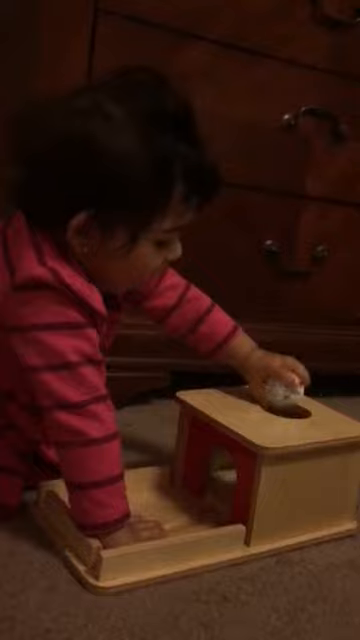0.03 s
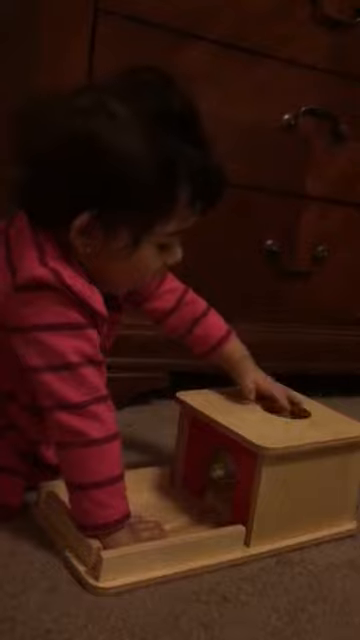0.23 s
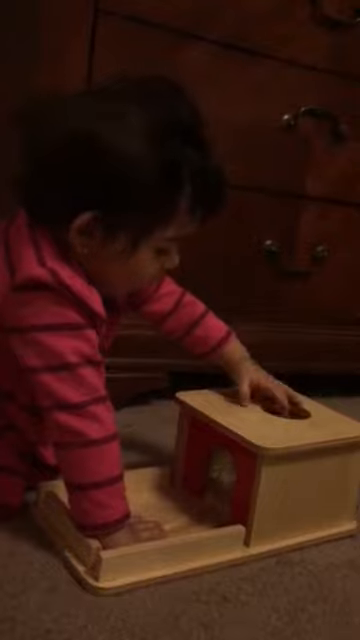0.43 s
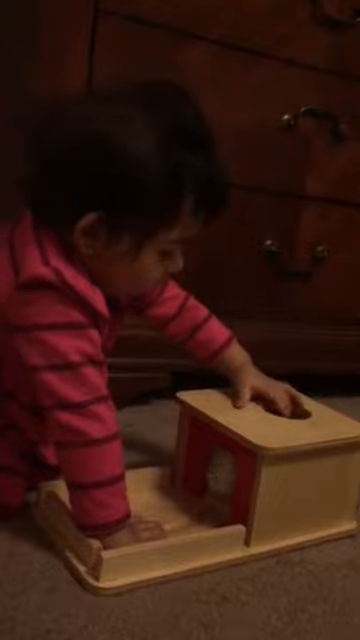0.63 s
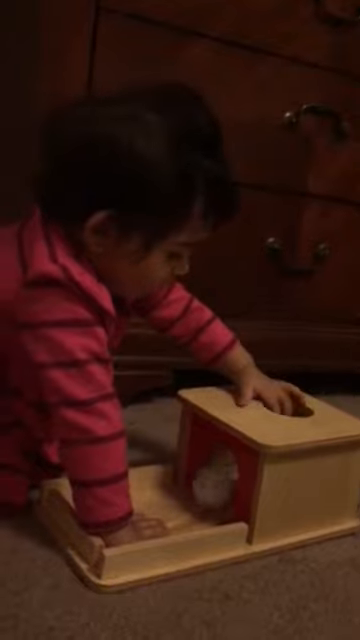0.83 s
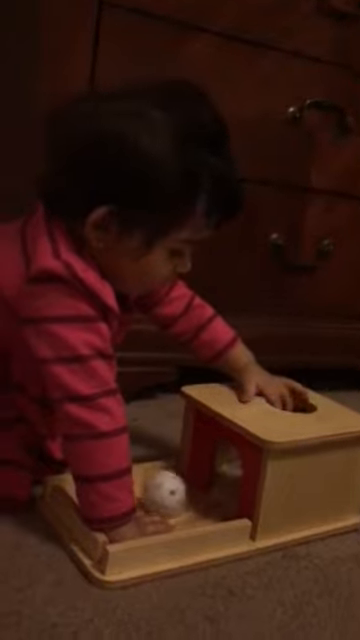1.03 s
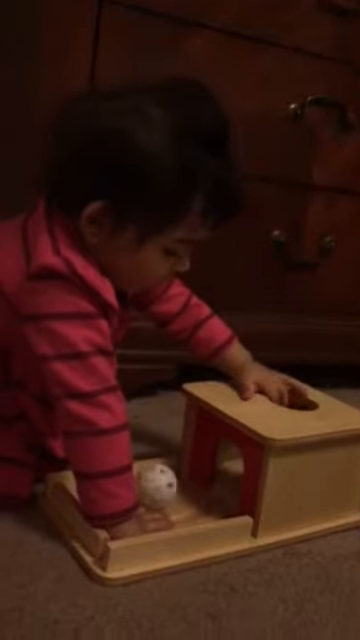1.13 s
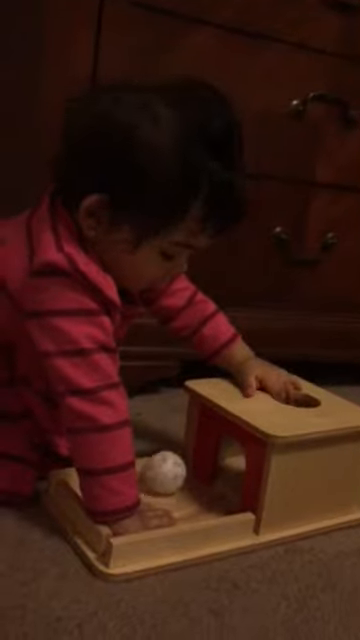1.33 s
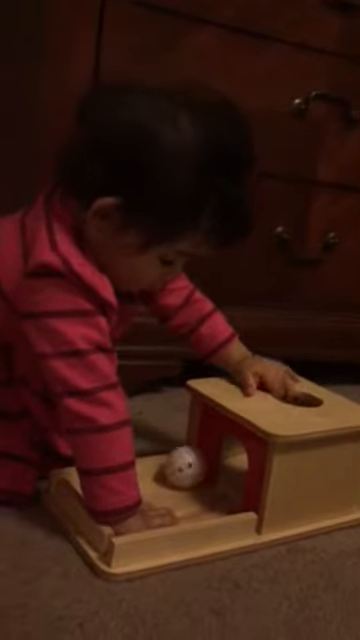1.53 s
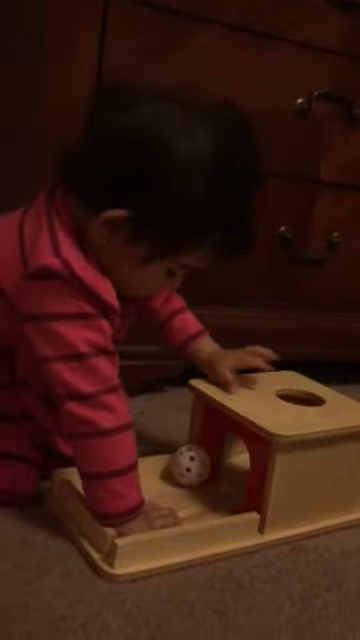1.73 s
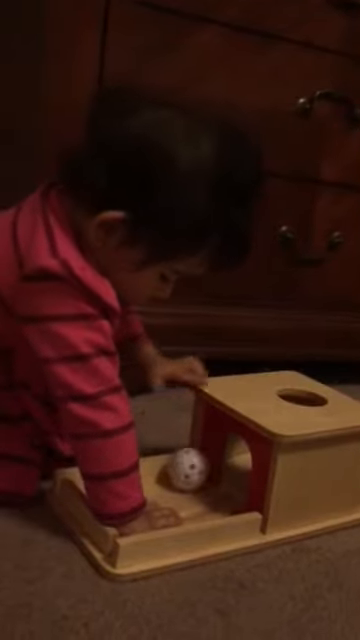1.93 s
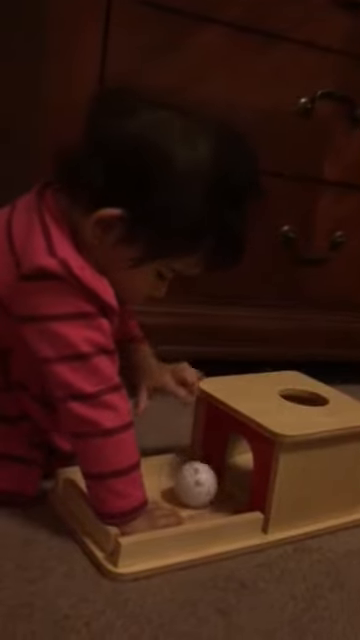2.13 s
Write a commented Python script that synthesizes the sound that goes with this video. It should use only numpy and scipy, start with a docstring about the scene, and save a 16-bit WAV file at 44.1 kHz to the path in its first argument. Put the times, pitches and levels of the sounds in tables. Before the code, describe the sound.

Close wooden clacks of a plastic ball falling into a toy box: a brief scrape, a sharp knock, faster and softer bounces, then a light rattling roll. A few faint taps follow over a low room rumble.

```python
"""In a carpeted room, a hollow plastic ball is pushed through the hole in a wooden toy box's lid.
It scrapes past the rim, lands with a knock, bounces ever faster towards the box's doorway,
then rolls out and chatters across the wooden tray. Each hit makes the wood ring and the ball click.
A few faint taps follow as the hand leaves the box. A quiet, low rumble lies underneath."""
import sys
import numpy as np
from scipy import signal
from scipy.fft import rfft, irfft
from scipy.io import wavfile
from scipy.ndimage import uniform_filter1d

SR = 44100
rng = np.random.default_rng(int(sys.argv[2]) if len(sys.argv) > 2 else 0)


def persist_wave(psi):
    """Save psi, clipped to +-1, as 16-bit WAV."""
    counts = np.round(np.clip(psi, -1, 1) * 32767).astype(np.int16)
    wavfile.write(sys.argv[1], SR, np.atleast_2d(counts).T)


N = 97020
T = np.arange(SR // 3) / SR  # time since a hit [s]
RIM, BACK, MIDDLE, FRONT, SILL, TRAY = range(6)  # places to hit; BACK to FRONT are on the box's floor

# A "colour" says how strong each pitch is in a noise. A "fade time" is how long a 60 dB drop takes.
# Steady background noise (frequency [Hz], relative level [dB])
ROOM_TONE_COLOUR = [(20, -26), (35, -19.5), (50, -5.5), (85, 0), (190, -12), (270, -16.5), (400, -21.5),
                    (700, -30), (1500, -30.5), (3600, -34), (10500, -41.5)]
# Muffled rumble (time [s], level [dB])
RUMBLE_LEVELS = [(0, -53.5), (.07, -70.5), (.12, -55.5), (.2, -60.5), (.3, -57.5), (.7, -56), (1.1, -58),
                 (1.38, -55.5), (1.54, -57.5), (1.66, -68), (1.73, -51), (1.92, -64), (1.97, -52),
                 (2.02, -59), (2.2, -54.5)]
# The rumble's colour (frequency [Hz], relative level [dB])
RUMBLE_SPECTRUM = [(30, -30.5), (55, -13), (85, 1), (130, -0.5), (200, -1.5), (270, -10), (400, -28.5),
                   (1000, -50.5)]
# How long the room echoes (frequency [Hz], fade time [s])
ECHO_FADES = [(150, 0.6), (600, 0.52), (1200, 0.16), (2600, 0.25), (6000, 0.15), (10000, 0.3)]
# How strongly it echoes (frequency [Hz], level [dB])
ECHO_LEVELS = [(150, -17.5), (600, -15.5), (820, -17), (1000, -15), (1250, -12.5), (1700, -8),
               (2700, -11.5), (4200, -11), (6000, -10.5), (10000, -18)]
# The wood's own tones (frequency [Hz], fade time [s], then for each of the six places: strength [dB])
WOOD_TONES = [ (87.1, 0.25, -37.5, -34.5, -20, -17, -17, 5),
              (205, 0.018, -37.5, -20.5, -31.5, -39, -31.5, -19),
              (366.5, 0.028, -24, -17.5, -25, -23, -23, -14.5),
              (508, 0.034, -11, -9.5, -15, -23.5, -29, -22.5),
              (626.6, 0.051, -29, -7, -15, -31, -27, -16.5),
              (726.4, .07, -16, -13.5, -8.5, -12, -26.5, -11),
              (961.4, .055, -28.5, 0.5, -4, -10.5, -14, 6.5), (1086.5, .03, -23, 2.5, 0, -5, -10, -7),
              (1205.6, 0.049, 2.5, 1.5, 3.5, 4, 2.5, -4), (1310.4, 0.099, -18.5, -4, -4, -22.5, -13, -4),
              (1415, 0.028, -19, -12, -17, -14.5, -19.5, -2.5),
              (1589.5, 0.078, -19.5, -19.5, -12, -8, -8.5, -5.5),
              (1786, 0.039, -25, -8.5, -14.5, -12, -9, -1), (2137, .03, -26, -21.5, -16.5, -12.5, -7.5, 1),
              (2418, 0.029, -25.5, -18.5, -23.5, -25, -21.5, -29),
              (2660, 0.054, -17.5, -7.5, -5.5, -8.5, -26.5, -26.5),
              (2844, 0.054, -41, -28.5, -39, -49, -37, -13),
              (3412, .02, -36.5, -24.5, -12.5, -13.5, -28, -19),
              (5535, 0.029, -53, -21.5, -38.5, -43, -44.5, -40),
              (5916, 0.025, -47, -18.5, -42, -30.5, -31, -16.5)]
# Crowded higher tones that blur into a clatter (frequency [Hz], relative level [dB])
CLATTER_COLOUR = [(60, -40), (200, -23.5), (800, -19), (1300, -12), (2000, 4.5), (3600, 0.5), (4400, -2),
                  (6000, -4.5), (7000, -12), (10500, -21)]
CLATTER_DB = [-25.5, -7, -15.5, -25.5, -17, -15]  # one for each place
# The ball's own tones (frequency [Hz], relative level [dB], fade time [s])
SHELL_TONES = [(4750, -13, 0.01), (5890, -1, 0.012), (6422, 2, 0.017), (6820, -3, 0.015),
               (7420, -2.5, 0.024), (8240, 1.5, 0.015), (9104, -1, 0.014), (10050, -7, 0.0071)]
# Its many short tones that blur into a crack (frequency [Hz], relative level [dB])
CRACK_COLOUR = [(150, -2.5), (500, -8), (1500, 4), (2400, -3), (3400, 0.5), (4500, -14), (6000, -7.5),
                (8500, -2), (10500, -7)]
# The ball scraping through the hole (time [s], level [dB])
SCRAPE_LEVELS = [(.238, -70.5), (.246, -52.5), (.265, -45.5), (.285, -42), (.298, -46.5), (.318, -52),
                 (.332, -71)]
# The scrape's hiss (frequency [Hz], relative level [dB])
SCRAPE_COLOUR = [(400, -7), (520, 4), (800, -9.5), (1200, 5.5), (1800, -4), (2650, 4.5), (3200, -6),
                 (4700, -16.5), (6200, -4.5), (8300, -5.5), (9400, 0.5), (10800, -8)]
# The ball rolling on the tray (time [s], level before filtering [dB])
ROLL_LEVELS = [(.9, -84), (.98, -64), (1.13, -43.5), (1.19, -65), (1.28, -67.5), (1.42, -64.5),
               (1.5, -62.5), (1.56, -54.5), (1.64, -101.5)]
# The ball bumping over its own holes (time [s], wood gain [dB], click gain [dB])
ROLL_BUMPS = [ (1.1685, -60.5, -60.5), (1.196, -71, -52.5), (1.2163, -68.5, -52.5), (1.237, -61, -57.5),
              (1.2899, -36.5, -41), (1.3109, -38, -47), (1.3293, -37, -42.5), (1.3462, -38.5, -43.5),
              (1.3600, -36, -62), (1.3719, -36, -47.5), (1.3828, -39.5, -46.5), (1.3920, -41, -56),
              (1.4000, -37.5, -56), (1.4070, -41, -54), (1.4151, -44.5, -57), (1.4187, -44, -75),
              (1.4260, -55.5, -72.5), (2.1070, -56.5, -82)]
# Knocks and taps (time [s], place, wood gain [dB], click gain [dB])
HITS = [ (.2384, RIM, -14.5, -47), (0.2747, RIM, -26, -61), (0.3704, RIM, -41.5, -65.5),
        (.3900, BACK, -4.5, -21), (0.3945, SILL, -27.5, -28), (.4870, BACK, -36.5, -43.5),
        (0.5347, MIDDLE, -8.5, -18), (.5920, SILL, -29, -50), (.6497, MIDDLE, -9, -20.5),
        (.7675, FRONT, -12, -19.5), (.7790, TRAY, -34, -45), (0.8597, SILL, -31, -32),
        (0.8665, SILL, -14, -19.5), (0.915, SILL, -45, -39), (0.9524, RIM, -24, -42.5),
        (.9790, SILL, -24, -28), (1.0070, TRAY, -59, -47), (1.021, TRAY, -32.5, -34),
        (1.0553, TRAY, -31.5, -35.5), (1.087, TRAY, -36, -43.5), (1.118, TRAY, -33, -33),
        (1.5048, TRAY, -32.5, -38), (1.703, RIM, -64.5, -92.5), (1.7524, RIM, -46.5, -60)]


def amp(db):
    """Turns decibels into a number to multiply by."""
    return 10 ** (np.asarray(db) / 20)


def unit(x):
    """Scales a sound to an average (rms) size of one."""
    return x / np.sqrt(np.mean(x ** 2) + 1e-20)


def read(table, hz):
    """Looks up a value by pitch, sliding smoothly between rows."""
    row_hz, value = np.transpose(table)
    return np.interp(np.log(hz + 1), np.log(row_hz + 1), value)


def level(table):
    """A volume curve from rows of (time [s], level [dB]); silent outside them."""
    return amp(np.interp(np.arange(N) / SR, *np.transpose(table), left=-140, right=-140))


def noise(colour, size):
    """Noise of the given colour."""
    gains = amp(read(colour, np.fft.rfftfreq(size, 1 / SR)))
    return unit(irfft(rfft(rng.standard_normal(size)) * gains, size))


def add(mix, start_s, sound):
    """Mixes a sound in at the given time."""
    part = mix[round(start_s * SR):][:len(sound)]
    part += sound[:len(part)]


def low_pass(x, hz):
    """Cuts away the sound above a frequency."""
    taps = signal.firwin(301, hz, window=("kaiser", 7), fs=SR)
    return signal.oaconvolve(x, taps[None], "same")


def background():
    """Quiet room noise, microphone hiss and an uneven low rumble."""
    room_tone = amp(-60.5) * noise(ROOM_TONE_COLOUR, N)
    hiss = amp(-81) * rng.standard_normal(N)
    return room_tone + hiss + level(RUMBLE_LEVELS) * noise(RUMBLE_SPECTRUM, N)


def room(x, near_db=-16, near_fade_s=.061):
    """Adds quick echoes off the tray, the child and a chest of drawers, then a short, soft tail."""
    t = np.arange(SR // 2) / SR
    near, far = rng.choice([-1., 1.], (2, len(t))) * (rng.random((2, len(t))) < .12)  # scattered echoes
    near = near * amp(-60 * t / near_fade_s) * (t > .003)
    hz, when, bands = signal.stft(far * np.clip(t / .014, 0, 1) ** 2, SR, nperseg=256)
    fade_s = read(ECHO_FADES, hz)[:, None]
    bands *= amp(read(ECHO_LEVELS, hz)[:, None] - 60 * when / fade_s)
    bands *= np.sqrt(2 * np.log(1000) / (fade_s * SR * np.mean(far ** 2)))  # long fades add no energy
    tail = signal.istft(bands, SR, nperseg=256)[1][:len(t)]
    return x + signal.fftconvolve(x, tail + amp(near_db) * near / np.linalg.norm(near))[:N]


def wood_ring(place, clatter_fade_s=.035, clatter_rise_s=.0019):
    """Struck wood clatters and rings with many tones; the mix depends on where it is hit."""
    clatter_shape = amp(CLATTER_DB[place] - 60 * T / clatter_fade_s) * (1 - np.exp(-T / clatter_rise_s))
    ring = clatter_shape * noise(CLATTER_COLOUR, len(T))
    typical_fade_s = np.median([row[1] for row in WOOD_TONES])
    for k, (hz, fade_s, *place_db) in enumerate(WOOD_TONES):
        rise_s = .00024 + .64 / hz  # low tones swell more slowly
        swell = 1 - np.exp(-(T / rise_s) ** 2)
        db = place_db[place] + .5 * rng.standard_normal()  # no two spots ring alike
        height = (-1) ** k * amp(db) * typical_fade_s / fade_s  # neighbours start in opposite directions
        ring += height * swell * amp(-60 * T / fade_s) * np.sin(2 * np.pi * hz * T)
    return ring


def ball_click(crack_fade_s=.024, rise_s=.00019):
    """The ball's shell rings briefly over a dry crack, a little differently each time as it turns."""
    hz, db, fade_s = np.transpose(SHELL_TONES)[:, :, None]
    louder, detune, phase = rng.standard_normal((3, len(SHELL_TONES), 1))
    height = amp(db + 1.5 * louder)
    tones = np.sin(2 * np.pi * (hz * (1 + .0085 * detune) * T + phase))
    shell = height / np.linalg.norm(height) * amp(-60 * T / fade_s) * tones
    crack = amp(-2 - 60 * T / crack_fade_s) * noise(CRACK_COLOUR, len(T))
    return (shell.sum(0) + crack) * (1 - np.exp(-T / rise_s))


def scrape(grain_db=3, ring_db=2):
    """The ball rubs past the rim with a grainy hiss and sets the lid ringing."""
    volume = level(SCRAPE_LEVELS)
    grain = amp(grain_db * unit(uniform_filter1d(rng.standard_normal(N), size=60)))
    rim = wood_ring(RIM)
    ring = signal.fftconvolve(volume * rng.standard_normal(N), rim / np.linalg.norm(rim))[:N]
    return volume * unit(noise(SCRAPE_COLOUR, N) * grain) + amp(ring_db) * ring


def roll(band_hz=(410, 1713)):
    """The rolling ball keeps the tray murmuring and bumps softly over its own holes."""
    jolts = rng.laplace(size=N)
    tray = level(ROLL_LEVELS) * unit(signal.fftconvolve(jolts, wood_ring(TRAY))[:N])
    clicks = np.zeros(N)
    for start_s, wood_db, click_db in ROLL_BUMPS:
        add(tray, start_s, amp(wood_db) * wood_ring(TRAY))
        add(clicks, start_s, amp(click_db) * ball_click())
    # A light touch leaves the wood's lowest and highest tones still.
    soft = signal.butter(4, band_hz, "bandpass", fs=SR, output="sos")
    return signal.sosfiltfilt(soft, tray) + clicks


def knocks():
    """Every hit makes the wood ring and the ball click."""
    mix = np.zeros(N)
    for start_s, place, wood_db, click_db in HITS:
        add(mix, start_s, amp(wood_db) * wood_ring(place) + amp(click_db) * ball_click())
    return mix


def scene():
    """The toy in its room, over the background, in one channel."""
    return (room(knocks() + scrape() + roll()) + background())[None]


def record(dry, hardness=14.5):
    """The microphone misses the highest treble and slightly squashes the loudest knock."""
    mic = low_pass(dry, hz=10550)
    squashed = mic / (1 + abs(mic) ** hardness) ** (1 / hardness)
    return low_pass(squashed, hz=15760)


dry = scene()
out = record(dry)
persist_wave(out)
```